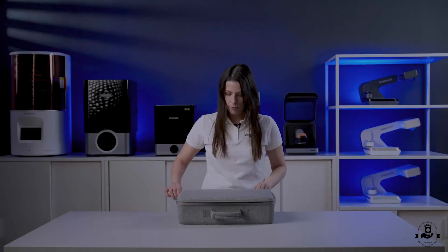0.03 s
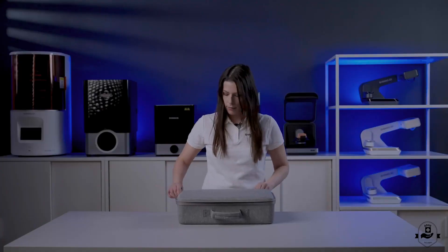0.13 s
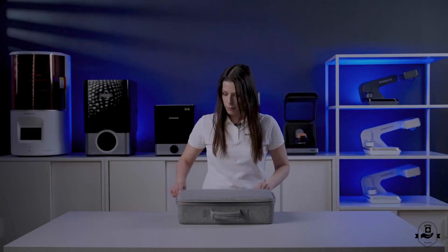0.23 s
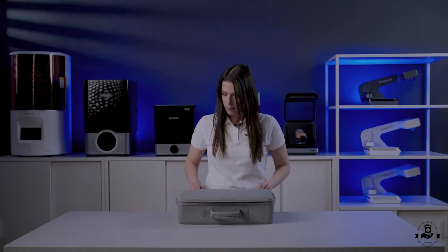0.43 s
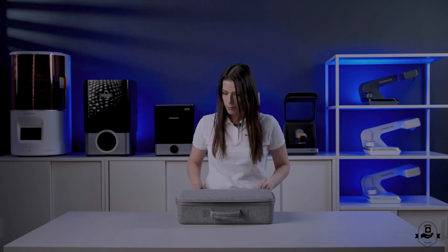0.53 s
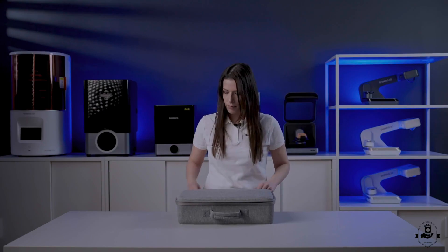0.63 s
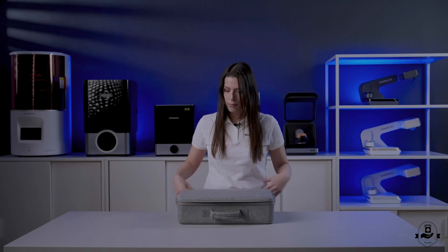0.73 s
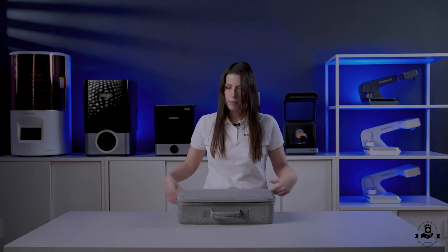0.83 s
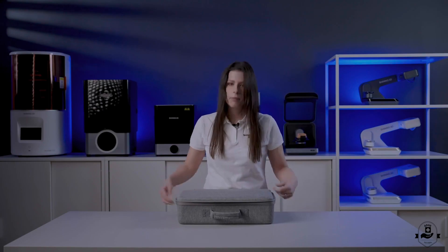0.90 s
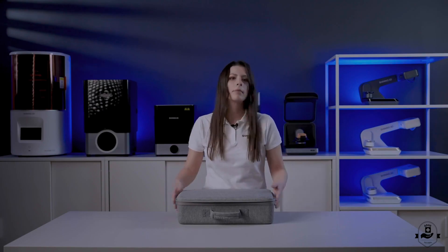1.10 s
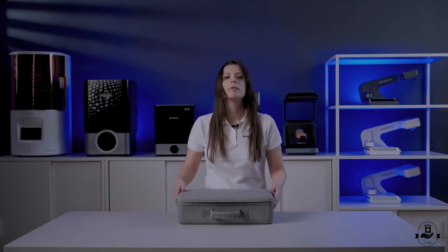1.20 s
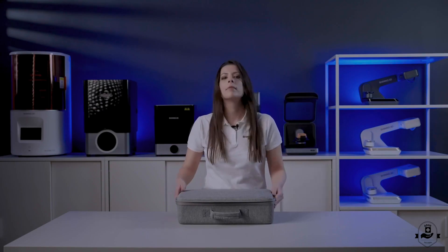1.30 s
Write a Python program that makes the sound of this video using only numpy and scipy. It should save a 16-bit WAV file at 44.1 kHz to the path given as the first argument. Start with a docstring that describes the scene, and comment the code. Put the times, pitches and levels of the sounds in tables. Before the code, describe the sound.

A fabric case is unzipped in one quick pull, then the metal tab ticks faintly.

```python
"""A zipper is pulled round the corner of a stiff fabric case on a table, in a quiet studio.
First a hand brushes the cover and the slider catches. Then it drags, speeds up and rasps over
the teeth, which shake the hollow shell, and stops before half a second has passed. Afterwards
the metal pull tab ticks, the case knocks softly and hands brush the cover again.
One close microphone hears it all, with a short room echo and faint ventilation behind it."""
import sys
import numpy as np
from scipy import signal
from scipy.fft import rfft, irfft
from scipy.io import wavfile
from scipy.ndimage import uniform_filter1d

SR = 44100
rng = np.random.default_rng(int(sys.argv[2]) if len(sys.argv) > 2 else 0)


def output_pcm(signal):
    """Save a mono or channel-first signal as 16-bit PCM at the path in sys.argv[1].

    Samples are clipped to [-1, 1] before scaling.
    """
    pcm = np.clip(np.atleast_2d(signal).T, -1, 1) * 32767
    wavfile.write(sys.argv[1], SR, np.round(pcm).astype(np.int16))


N = 59535
TIME = np.arange(N) / SR
HZ = np.maximum(np.arange(N + 1) * SR / (2 * N), 1)  # the pitches at which filters are drawn

# Tone of something dragging on the fabric: pitch_hz, relative_level_db
FABRIC_TONE = [(200, -9), (300, -5), (520, 1), (700, -6), (1000, 0), (1500, -16), (2300, -16), (2950, -13),
               (3500, -25.5), (5500, -23), (7300, -37), (12000, -36.5)]


def zipper():
    """Teeth pass through the slider one by one; each one rasps and kicks the shell."""
    # How fast the slider moves: time_s, teeth_per_s
    slider_speed = [(.215, 90), (.26, 120), (.287, 159), (.298, 206), (.313, 251), (.321, 383), (.326, 428),
                    (.346, 518), (.36, 466), (.369, 320), (.379, 279), (.398, 333), (.44, 297)]
    start_s, stop_s, jitter_s = .21, .448, .00002
    anchor_s = .3269  # teeth are counted from the one that passes at this moment
    speed = curve(slider_speed)
    teeth_passed = np.cumsum(speed) / SR
    teeth_passed -= np.interp(anchor_s, TIME, teeth_passed)
    tooth_times = np.interp(np.arange(-60, 120), teeth_passed, TIME)
    pulling = (tooth_times > start_s) & (tooth_times < stop_s)
    tooth_times += jitter_s * rng.standard_normal(len(tooth_times))
    teeth = clicks(tooth_times, pulling)
    return tooth_rasp(teeth, speed) + shell_ring(teeth)


def tooth_rasp(teeth, speed):
    """Each tooth snaps through the slider with a crack and a brief scrape, duller when slow."""
    # How hard the teeth snap: time_s, level_db
    snap_force = [(.205, -78), (.218, -86), (.279, -67), (.287, -44.5), (.312, -39.5), (.325, -33),
                  (.34, -29.5), (.358, -34.5), (.38, -34), (.403, -34), (.425, -41.5), (.44, -44),
                  (.447, -62), (.46, -110)]
    # Tone of the rasp on the side of the case: pitch_hz, relative_level_db
    side_tone = [(350, -42.5), (600, 1), (746, -27), (966, -3.5), (1230, -32.5), (1430, 1.5), (1620, -21),
                 (1780, -0.5), (2540, -10), (2910, -1.5), (3160, -11), (3380, -3.5), (4310, -2.5),
                 (4880, -12), (6230, 1), (7540, -11.5), (8400, -3.5), (11800, -11.5), (15500, -9.5)]
    # Tone of the rasp on the back of the case: pitch_hz, relative_level_db
    back_tone = [(440, -32), (750, -10), (862, -5), (1060, -10.5), (1280, -12.5), (2070, -14.5), (3020, -5),
                 (3390, -8), (3940, -2), (4370, -1.5), (5020, -7.5), (6630, -3.5), (7720, -12), (8990, -10),
                 (9700, -19), (10600, -17), (15500, -20)]
    decay_s, bright_teeth_per_s, dull_hz = .0012, 333, 3780
    corner_s, turn_s = .354, .015
    scrape = fade(teeth, decay_s) * rng.standard_normal(N)
    crack = .99 * np.sqrt(decay_s * SR / 2) * slider_echoes(teeth)  # about as strong as the scrape
    snap = steady(scrape + crack, samples=550) * from_db(curve(snap_force))
    brightness = np.clip(speed / bright_teeth_per_s, 0, 1) ** 2
    dull_snap = butter_filter(snap, 1, dull_hz, "low")
    snap = brightness * snap + (1 - brightness) * dull_snap
    # The side tone is heard when the slider is fast and has not yet rounded the corner.
    side_share = brightness * np.clip((corner_s - TIME) / turn_s + .5, 0, 1)
    return side_share * colour(snap, side_tone) + (1 - side_share) * colour(snap, back_tone)


def slider_echoes(x, feedback=.9):
    """Reflections inside the slider spread a crack out in time without changing its tone."""
    for delay_samples in (3, 7, 11, 17):
        loop = np.r_[1, np.zeros(delay_samples - 1), -feedback]
        x = signal.lfilter(loop[::-1], loop, x)
    return x


def shell_ring(teeth):
    """The teeth kick the hollow shell, which rings briefly at its own pitches."""
    # The shell's resonances: pitch_hz, relative_level_db, ring_s (time to fall by 60 dB)
    resonances = [(310, -9, 0.021), (440, 0.5, 0.024), (613, -1.5, .028), (920, -13, 0.016),
                  (1240, -3, 0.013), (1416, -2.5, 0.011)]
    # How hard the teeth push on the shell: time_s, level_db
    push = [(.205, -66.5), (.22, -60), (.28, -57.5), (.3, -46.5), (.32, -37.5), (.337, -34.5), (.36, -37.5),
            (.388, -34), (.415, -45.5), (.43, -42), (.441, -41.5), (.452, -70), (.47, -110)]
    shell = 0
    for k, (pitch_hz, level_db, ring_s) in enumerate(resonances):
        direction = (-1) ** k  # neighbouring resonances swing opposite ways
        shell += direction * from_db(level_db) * ring(teeth, pitch_hz, ring_s)
    return steady(shell, samples=400) * from_db(curve(push))


def lid_drumming(pitch_hz=190.6, width_hz=97):
    """Uneven drag keeps the lid's lowest resonance booming."""
    # Loudness of the boom as the slider tugs: time_s, level_db
    boom_level = [(.205, -74), (.226, -44), (.24, -44), (.275, -42.5), (.298, -38.5), (.325, -41.5),
                  (.342, -54.5), (.37, -50), (.385, -75), (.42, -100)]
    band_hz = [pitch_hz - width_hz / 2, pitch_hz + width_hz / 2]
    boom = butter_filter(rng.standard_normal(N), 2, band_hz, "band")
    return steady(boom, samples=700) * from_db(curve(boom_level))


def slider_catches():
    """The slider catches as it starts to move, giving short scratches."""
    # Each catch: start_s, relative_level_db, treble_tilt_db_per_octave
    catches = [(.1955, -14, 2.5), (.2158, -17.5, -0.2)]
    return bursts(catches, FABRIC_TONE)


def metal_ticks():
    """The slider and its pull tab touch in short, bright ticks."""
    # Each touch: start_s, relative_level_db, treble_tilt_db_per_octave
    touches = [(0.1588, -42, -6.5), (.2035, -36, 1), (.7022, -35, -9.5), (0.7144, -37, 0.5),
               (0.723, -37, -5.5), (.7328, -28.5, 5.5), (.7415, -30.5, -2), (.7475, -25.5, -3),
               (.7494, -19.5, 0.5), (.7531, -20.5, -2), (.7622, -16, 2.5), (.772, -27.5, 0),
               (.7891, -27, -6.5), (.7918, -25.5, 2), (.795, -35, -5)]
    # Tone of the small metal parts: pitch_hz, relative_level_db
    metal_tone = [(710, -27), (1200, -15), (1650, -28), (2480, -5), (4620, -10), (5430, -6.5), (6370, -4.5),
                  (7250, 0.5), (7980, -7), (8700, -5.5), (9370, -15.5), (10100, -2), (11400, -14.5),
                  (12900, -1.5), (15500, -11.5)]
    return bursts(touches, metal_tone)


def knocks_and_stop_echo():
    """Knocks on the padded case, and a soft 600 Hz room echo just after the slider stops."""
    # Each brief tone (the echo is at 0.466 s): start_s, peak_db, pitch_hz, swell_s
    brief_tones = [(0.1422, -43.5, 415, 0.0017), (.151, -49.5, 232, 0.0026), (.227, -33.5, 181, 0.0087),
                   (.287, -36.5, 139.6, 0.0055), (.312, -30.5, 205.4, .006), (.431, -35.5, 314.4, 0.0047),
                   (.466, -44, 600, 0.0031), (.7305, -52.5, 920, 0.0014), (0.7404, -47, 393, 0.001),
                   (.748, -40.5, 741, 0.0022), (.7505, -47.5, 1080, 0.0032), (.7535, -41, 470, 0.0017),
                   (.748, -47, 206.4, 0.0094), (.7885, -45.5, 754, 0.0019), (.792, -49, 206, 0.0052),
                   (0.9084, -44, 769, 0.00081), (0.967, -60.5, 116.6, 0.003), (1.193, -54.5, 191, 0.0063)]
    sound = 0
    for start_s, peak_db, pitch_hz, swell_s in brief_tones:
        age = np.maximum(TIME - start_s, 0)
        envelope = age / swell_s * np.exp(1 - age / swell_s)
        sound += from_db(peak_db) * envelope * np.sin(2 * np.pi * pitch_hz * age)
    return sound


def drags_and_tap_tail():
    """Slider and fingers drag on the fabric; a faint, diffuse tail follows the tap at 0.91 s."""
    # The drags, then the tap's tail: start_s, length_s, level_db, treble_tilt_db_per_octave
    swells = [(.2, 0.0084, -51, 1), (.2175, 0.14, -49.5, 0.5), (.425, 0.018, -46, 2.5),
              (.733, 0.031, -57, 0), (.789, 0.0098, -58, -2), (.912, 0.0072, -64.5, -1.5)]
    return grainy_noise(swells, FABRIC_TONE)


def hand_brushes():
    """Hands slide lightly over the cover."""
    # Each stroke: start_s, length_s, level_db, treble_tilt_db_per_octave
    strokes = [(0, 0.041, -58.5, -2), (.655, 0.023, -71, 1.5), (1.155, 0.044, -71, 3.5),
               (1.19, 0.031, -66.5, 0.5), (1.24, 0.14, -70.5, 1.5), (1.315, 0.032, -69.5, 1)]
    # Tone of a hand on the cover: pitch_hz, relative_level_db
    brush_tone = [(130, 2.5), (250, -4), (600, -2), (1000, -10.5), (1800, -19), (3200, -13), (5000, -20.5),
                  (9000, -26.5), (15000, -18)]
    return grainy_noise(strokes, brush_tone)


def room_echo(x, ring_s=.24, delay_s=.01, level_db=-10.5):
    """The room answers with a short tail of echoes, duller in the treble."""
    tail = rng.standard_normal(N) * from_db(-60 * TIME / ring_s) * (TIME > delay_s)
    tail /= np.linalg.norm(tail)
    treble_loss = from_db(-1.55 * np.log2(np.maximum(HZ / 1000, 1)))  # per octave above 1000 Hz
    tail = irfft(rfft(tail, 2 * N) * treble_loss)[:N]
    return from_db(level_db) * signal.fftconvolve(x, tail)[:N]


def room_tone(noise_db=-66.5, hum_hz=116, hum_db=-72.5):
    """Ventilation rumbles with a low hum, and the microphone hisses."""
    # Tone of the rumble and hiss: pitch_hz, relative_level_db
    noise_tone = [(25, -35.5), (45, -32), (62, -10.5), (80, -1), (115, 1.5), (160, -2.5), (220, -9),
                  (330, -12.5), (470, -13), (620, -13), (900, -21.5), (1400, -23.5), (2500, -30),
                  (4200, -31.5), (7000, -31.5), (11000, -31.5), (13000, -25), (15500, -25.5)]
    hum = np.sqrt(2) * np.sin(2 * np.pi * (hum_hz * TIME + rng.random()))
    noise = colour(rng.standard_normal(N), noise_tone)
    return from_db(noise_db) * noise + from_db(hum_db) * hum


def bursts(touches, tone, gain_db=-19, decay_s=.0012):
    """Each touch makes a burst of noise that dies away at once."""
    sound = 0
    for start_s, level_db, tilt_db in touches:
        hit = clicks(np.array([start_s]), from_db(level_db + gain_db))
        burst = fade(hit, decay_s) * rng.standard_normal(N)
        sound += colour(burst, tone, tilt_db)
    return sound


def grainy_noise(swells, tone, grain_db=3, rise_s=.0087, fall_s=.011):
    """Rough noise that rises, holds and falls once for each row."""
    sound = 0
    for start_s, length_s, level_db, tilt_db in swells:
        age = TIME - start_s
        envelope = np.exp(np.minimum(age, 0) / rise_s - np.maximum(age - length_s, 0) / fall_s)
        noise = rng.standard_normal(N)
        grain = from_db(grain_db * np.minimum(rng.exponential(1, N), 5))
        sound += from_db(level_db) * colour(unit_power(noise * grain) * envelope, tone, tilt_db)
    return sound


def colour(x, tone, tilt_db=0):
    """Filter x to a tone table, fading out the bass below the table's first pitch."""
    pitch_hz, level_db = np.transpose(tone)
    octaves = np.log2(HZ / pitch_hz[0])
    shape_db = np.interp(np.log(HZ), np.log(pitch_hz), level_db) + tilt_db * octaves
    shape_db -= 18 * np.clip(-octaves, 0, 3)
    # Folding the cepstrum makes the filter ring only after a sound, never before it.
    cepstrum = irfft(np.log(unit_power(from_db(shape_db))))
    cepstrum[1:N] *= 2
    cepstrum[N + 1:] = 0
    return irfft(rfft(x, 2 * N) * np.exp(rfft(cepstrum)))[:N]


def clicks(times_s, sizes):
    """Single clicks, each shared between two neighbouring samples."""
    position = np.clip(times_s * SR, 0, N - 2)
    whole, part = position.astype(int), position % 1
    return np.bincount(whole, sizes * (1 - part), N) + np.bincount(whole + 1, sizes * part, N) + 1e-18


def fade(x, decay_s):
    """Give every click a smoothly dying tail."""
    return signal.lfilter([1], [1, -np.exp(-1 / (decay_s * SR))], x)


def ring(x, pitch_hz, ring_s):
    """Every click starts a tone that falls by 60 dB in ring_s."""
    decay = from_db(-60 / (ring_s * SR))
    angle = 2 * np.pi * pitch_hz / SR
    return signal.lfilter([.5, 0, -.5], [1, -2 * decay * np.cos(angle), decay ** 2], x)


def butter_filter(x, order, edge_hz, keep):
    """Keep the "low" part, the "high" part or one "band" of a sound."""
    return signal.sosfilt(signal.butter(order, edge_hz, keep, fs=SR, output="sos"), x)


def steady(x, samples):
    """Even out the loudness, averaged over this many samples."""
    power = np.abs(uniform_filter1d(x * x, samples))
    return x / np.sqrt(power + 1e-4 * np.mean(x * x))


def curve(rows):
    """Join (time_s, value) points with straight lines."""
    return np.interp(TIME, *np.transpose(rows))


def unit_power(x):
    """Scale to an average power of 1."""
    return x / np.sqrt(np.mean(x ** 2) + 1e-20)


def from_db(db):
    """Turn decibels into a multiplier."""
    return 10 ** (np.asarray(db) / 20)


def scene():
    """The case sits in the centre; only the ticks and a faint high hiss differ between the ears."""
    ticks = metal_ticks()
    case = zipper() + lid_drumming() + slider_catches() + ticks
    case += knocks_and_stop_echo() + drags_and_tap_tail() + hand_brushes()
    case = butter_filter(case, order=4, edge_hz=115, keep="high")
    hiss = butter_filter(rng.standard_normal(N), order=2, edge_hz=11300, keep="high")
    side = from_db(-83) * unit_power(hiss) + from_db(-18) * ticks
    centre = case + room_echo(case) + room_tone()
    return np.array([centre + side, centre - side])


def record(dry, peak_limit=.14, cutoff_hz=15650):
    """Loud peaks are rounded off and the highest treble is cut steeply."""
    rounded = peak_limit * np.tanh(dry / peak_limit)
    return signal.sosfilt(signal.ellip(12, .1, 80, cutoff_hz, fs=SR, output="sos"), rounded)


dry = scene()
out = record(dry)
output_pcm(out)
```